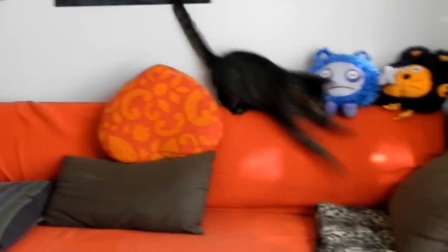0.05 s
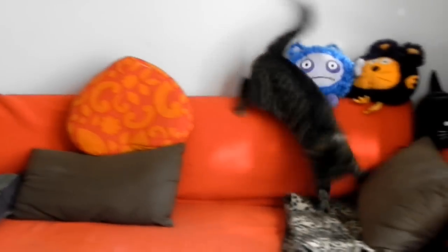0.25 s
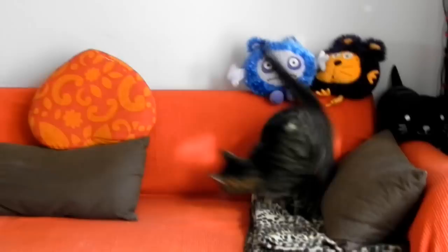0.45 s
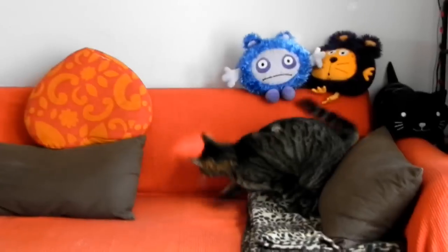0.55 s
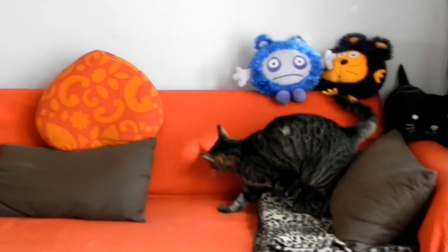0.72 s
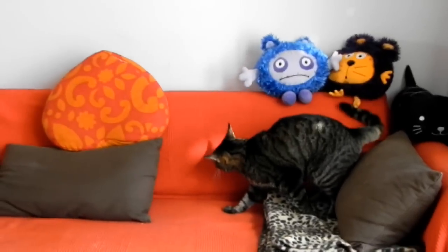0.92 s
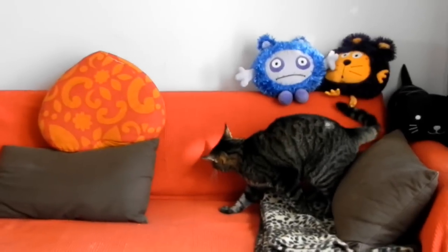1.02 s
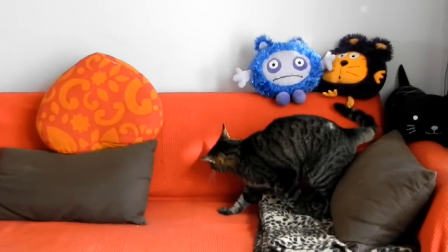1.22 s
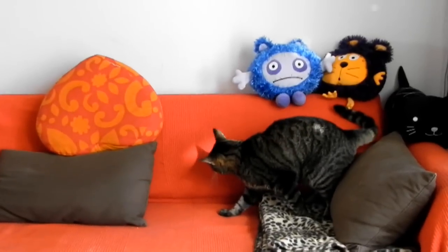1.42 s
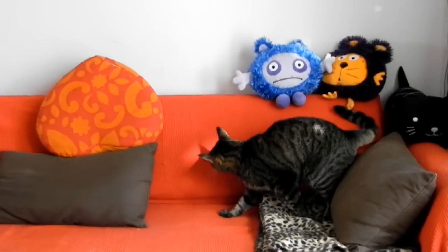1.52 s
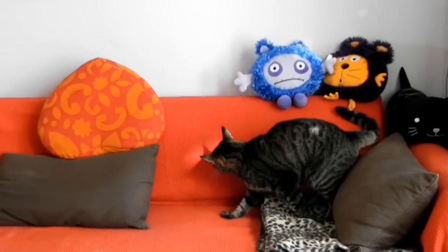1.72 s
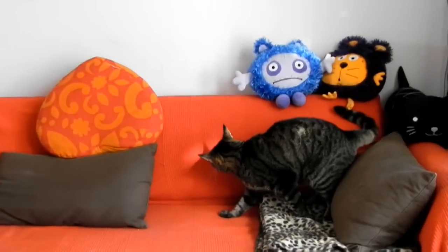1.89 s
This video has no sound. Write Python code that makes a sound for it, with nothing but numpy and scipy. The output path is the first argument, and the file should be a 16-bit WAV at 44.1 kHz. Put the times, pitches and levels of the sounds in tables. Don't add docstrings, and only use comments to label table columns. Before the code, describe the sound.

Cat paws thump on soft sofa cushions in a quiet, hissy room. Faint cloth rustle opens; light thuds begin around 0.2 seconds, claws scrape near 0.33, and the heaviest landing comes at 0.45 with a snappy claw catch and springy low sway. Another thump falls at 0.74, fading by 0.85. Then dry lens-motor ticks, about fifteen per second, continue to the end, with a barely audible brush near 1.1.

```python
import sys
import numpy as np
from scipy import signal
from scipy.fft import rfft, irfft
from scipy.io import wavfile
from scipy.ndimage import uniform_filter1d

SR = 44100
rng = np.random.default_rng(int(sys.argv[2]) if len(sys.argv) > 2 else 0)


def unload_audio(sound):
    columns = np.transpose(np.atleast_2d(sound))
    steps = np.round(np.clip(columns, -1, 1) * 32767)
    wavfile.write(sys.argv[1], SR, steps.astype(np.int16))


def amplitude_ratio(level_db):
    exponent = np.asarray(level_db, float) / 20
    return 10 ** exponent


N = 85995

# f/Hz, level/dB
MIDDLE_HISS = [(25, -64), (160, -6.5), (320, -14), (650, -8.5), (1500, -15), (7500, -27.5), (12000, -39.5),
               (15500, -34.5)]
# f/Hz, level/dB
SIDE_HISS = [(59, -29), (100, -16), (282, -14), (396, 3), (700, -4), (2710, -17), (7980, -32),
             (12200, -43.5), (15700, -41)]
# f/Hz, width/Hz, level/dB
ROOM_HUM = [(50, 27, -65.5), (96.2, 4.1, -64.5), (121.9, 8.1, -69.5), (238, 38, -75), (243.5, 23, -56.5),
            (423.5, 105, -55)]
# f/Hz, level/dB
APPLIANCE_TONES = [(120.5, -61), (217.5, -52)]
# t/s, effort/dB, brightness/dB
SCRAMBLE_EFFORT = [(0, -42, -1), (.07, -48, -6.5), (.12, -43.5, -4.5), (.17, -55.5, -3),
                   (0.216, -34.5, -15), (.25, -35.5, -28), (0.304, -43.5, -4), (0.323, -32, -9.5),
                   (0.348, -30.5, -5), (.385, -34, -6), (0.439, -32, -8.5), (0.455, -31, -3),
                   (0.536, -35.5, -14), (0.561, -47, -3.5), (.725, -50, -7.5), (0.738, -36.5, -16),
                   (.85, -48.5, -24), (1.0, -51, -12)]
# f/Hz, level/dB
CLOTH_TONE = [(60, -11), (150, 0), (270, 2.5), (550, 1.5), (1300, -15), (3000, -26.5), (4500, -39),
              (15500, -52.5)]
# f/Hz, width/Hz, level/dB
FRAME_MODES = [(56.4, 22, -4), (113.8, 32, 6.5), (177.7, 26, 2.5), (267, 6.3, 0)]
# t/s, level/dB, f/Hz, length/s
SPRING_HEAVES = [(.19, -42, 55, .07), (.44, -35, 51, .12), (.63, -38, 55, .09), (.73, -40, 58, .12),
                 (.56, -43, 60, .07), (.07, -42, 108, .05), (.447, -23.5, 120, .04), (.49, -28, 120, .055),
                 (.7318, -25, 110, .04), (.79, -29, 115, .04), (.13, -40, 116, .06), (.53, -40, 55, .05),
                 (.01, -40, 105, .06)]
# t/s, level/dB, cushion f/Hz, push length/s
PAW_THUMPS = [(.038, -35, 190, .022), (.183, -33, 205, .016), (.2185, -23, 186, .031),
              (.268, -33, 170, .014), (.3185, -25, 385, .010), (.329, -28, 262, .018),
              (.349, -26, 200, .012), (.360, -29, 240, .016), (.386, -30, 255, .016),
              (.403, -28, 410, .014), (.418, -33, 190, .016), (.4530, -13, 205, .019),
              (.471, -22, 265, .014), (.486, -23, 175, .014), (.490, -26, 310, .012),
              (.503, -31, 150, .012), (.5195, -25, 200, .014), (.532, -30, 185, .012),
              (.580, -36, 410, .02), (.635, -38, 400, .02), (.65, -37, 180, .02), (.7388, -19.5, 200, .018),
              (.759, -34, 580, .013), (.7565, -25, 250, .007), (.766, -29, 165, .022),
              (.800, -28, 215, .014), (.8145, -33, 170, .016), (.81, -36, 400, .014),
              (.835, -35, 130, .022)]
# knock/dB, knock f/Hz, ring/dB, rattle/dB
FAINT_STEP = (-57, 560, -54, -71)
# t/s, knock/dB, knock f/Hz, ring/dB, rattle/dB
MOTOR_STEPS = [(0.594, -40, 678, -44, -50), (0.667, -32, 550, -46, -56), (0.73, -27, 498, -44, -59),
               (0.794, -45, 565, -43.5, -55), (0.864, -30, 690, -45.5, -49.5),
               (0.928, -33.5, 520, -39, -52), (1, -30.5, 700, -47.5, -59), (1.066, -31.5, 538, -44.5, -63),
               (1.128, -30.5, 646, -45, -52), (1.198, -35, 798, -41.5, -57),
               (1.262, -34.5, 690, -39.5, -51), (1.329, -34.5, 680, -37, -55),
               (1.397, -29, 662, -67, -49.5), (1.464, -29.5, 520, -39, -51.5),
               (1.533, -29, 680, -40.5, -63), (1.594, -29, 675, -40, -53), (1.664, -32.5, 538, -49.5, -59),
               (1.731, -32, 527, -48.5, -56), (1.797, -26, 579, -51, -47.5), (1.865, -33, 557, -44, -56),
               (1.929, -26.5, 534, -44.5, -53)]
# f/Hz, width/Hz, level/dB
KNOCK_MODES = [(990, 250, -9), (430, 150, -7), (780, 250, -8), (1246, 300, -14)]
# f/Hz, width/Hz, level/dB
RING_MODES = [(1560, 180, 0), (1950, 500, -17)]
# f/Hz, width/Hz, level/dB
RATTLE_MODES = [(3900, 170, 0), (4480, 220, -7), (2950, 250, -11), (5130, 300, -16)]
# f/Hz, width/Hz, level/dB
CLICK_MODES = [(1200, 1200, 8), (2420, 1900, 5), (4140, 430, 1)]
# t/s, length/s, level/dB
FUR_SWISHES = [
    (0.072, 0.073, -55.5),
    (0.211, 0.056, -54.5),
    (0.34, 0.063, -70),
    (0.444, 0.044, -73),
    (1.08, 0.055, -55),
]
# f/Hz, level/dB
FUR_TONE = [(2500, 8), (6000, 1.5), (10000, 1), (15000, -12)]
# t/s, level/dB, f/Hz, width/Hz
CLAW_CATCHES = [(.210, -28, 650, 300), (.210, -39, 1300, 350), (.226, -35, 1250, 450),
                (.226, -31, 750, 400), (.326, -44, 7000, 5000), (.329, -30, 1900, 1200),
                (.352, -24, 1170, 250), (.449, -26, 900, 700), (.4555, -26, 2150, 450),
                (.4555, -25, 1050, 500), (.4555, -38, 7500, 3000), (.4555, -44, 11500, 4000),
                (.4555, -36, 4300, 1800), (.450, -47, 14000, 3000), (.445, -48, 7500, 200),
                (.4695, -45, 8500, 3000), (.4755, -47, 9000, 5000), (.466, -43, 4900, 300),
                (.741, -41, 2700, 900), (.741, -35, 1100, 500), (.733, -33, 700, 250),
                (.316, -29, 600, 400)]
# t/s, length/s, level/dB
CLAW_RAKES = [
    (.318, 0.057, -38),
    (.44, 0.057, -63),
    (1.085, 0.067, -57),
]
# f/Hz, level/dB
RAKE_TONE = [(800, -18), (1500, 26), (2300, 0), (3500, -9), (5000, -23), (9000, -47)]
# f/Hz, t60/s
ROOM_DECAY = [(60, 0.64), (200, 0.43), (600, 0.11), (2000, 0.25), (8000, 0.29)]
# f/Hz, level/dB
SIDE_PICKUP = [(40, -19), (200, -19), (350, -3), (600, 3.5), (3000, -2), (12000, -8.5)]


def evened(x):
    return x / np.sqrt(np.mean(x ** 2) + 1e-20)


def add(mix, start_s, sound):
    part = mix[..., round(start_s * SR):][..., :sound.shape[-1]]
    part += sound[..., :part.shape[-1]]


def colour(x, points):
    f, db = np.transpose(points)
    hz = np.fft.rfftfreq(len(x), 1 / SR)
    gain = amplitude_ratio(np.interp(np.log(hz + 1), np.log(f + 1), db))
    return irfft(rfft(x) * gain, len(x))


def resonate(x, hz, width):
    r = np.exp(-np.pi * width / SR)
    gain = (1 - r * r) / 2
    return signal.lfilter([gain, 0, -gain], [1, -2 * r * np.cos(2 * np.pi * hz / SR), r * r], x)


def body(x, modes):
    return sum(amplitude_ratio(db) * resonate(resonate(x, hz, width), hz, width) for hz, width, db in modes)


def air():
    middle, sides, rumble = rng.standard_normal((3, N))
    hum = sum(amplitude_ratio(db) * evened(resonate(resonate(rumble, hz, width), hz, width))
              for hz, width, db in ROOM_HUM)
    t = np.arange(N) / SR
    for hz, db in APPLIANCE_TONES:
        drift = uniform_filter1d(uniform_filter1d(rng.standard_normal(N), 1500), 1500)
        waver = 1 + 0.35 * evened(drift)
        hum = hum + amplitude_ratio(db) * np.sqrt(2) * waver * np.sin(2 * np.pi * hz * t)
    middle = amplitude_ratio(-51.5) * evened(colour(middle, MIDDLE_HISS)) + hum
    sides = amplitude_ratio(-42.5) * evened(colour(sides, [(20, -62)] + list(SIDE_HISS)))
    return np.array([middle, sides])


def scramble():
    grains_per_s, grain_spread_db = 4000, 2.5
    split_hz, bright_ref_db, frame_lag_s = 1320, -14.5, 0.017
    s, effort_db, bright_db = np.transpose(SCRAMBLE_EFFORT)
    t = np.arange(N) / SR
    effort = amplitude_ratio(np.interp(t, s, effort_db)) * np.clip((s[-1] - t) / 0.13, 0, 1)
    slips = rng.standard_normal(N) * (rng.random(N) < grains_per_s / SR)
    slips = slips * amplitude_ratio(grain_spread_db * np.minimum(rng.exponential(1, N), 4))
    cloth = evened(colour(evened(slips) + 0.5 * rng.standard_normal(N), CLOTH_TONE))
    dull = signal.sosfiltfilt(signal.butter(2, split_hz, fs=SR, output="sos"), cloth)
    cloth = dull + (cloth - dull) * amplitude_ratio(np.interp(t, s, bright_db) - bright_ref_db)
    pole = np.exp(-1 / (frame_lag_s * SR))
    drive = signal.lfilter([1 - pole], [1, -pole], effort) * rng.standard_normal(N)
    frame = body(drive, FRAME_MODES) * np.sqrt(SR / 100)
    return amplitude_ratio(0.5) * effort * cloth + amplitude_ratio(-10) * frame


def heaves():
    out = np.zeros(N)
    for s, db, hz, length in SPRING_HEAVES:
        t = np.arange(0, length, 1 / SR)
        add(out, s, amplitude_ratio(db) * np.sin(np.pi * t / length) * np.sin(2 * np.pi * hz * t))
    return out


def thumps():
    rise_share, overtone_ratio, overtone_db = 0.2, 2.1, -24
    out = np.zeros(N)
    for (s, db, hz, length), turn in zip(PAW_THUMPS, rng.random(len(PAW_THUMPS))):
        t = np.arange(0, 2 * length, 1 / SR)
        u = t / length
        push = np.minimum(u / rise_share, 1) * np.exp(-u ** 6)
        overtone = np.sin(2 * np.pi * (overtone_ratio * hz * t + turn))
        wave = -np.sin(2 * np.pi * hz * t) + amplitude_ratio(overtone_db) * overtone
        add(out, s, amplitude_ratio(db) * push * wave)
    return out


def lens():
    early_s, ticks_per_s, rise_s, step_s = 0.062, 15, 0.00188, 0.0053
    early = [(early_s + k / ticks_per_s, *FAINT_STEP) for k in range(8)]
    out, t = np.zeros((2, N)), np.arange(2600) / SR
    spans = step_s * np.array([[2.4], [0.7], [1.2], [0.6]])
    sides = (-0.53, 0.19, -0.076, 0.5)
    for s, knock_db, knock_hz, ring_db, rattle_db in early + list(MOTOR_STEPS):
        envelope = np.minimum(t / rise_s, 1) * np.exp(-(t / spans) ** 2)
        chatter = rng.standard_normal((4, len(t))) * envelope
        levels = (knock_db - 6.5, ring_db + 3.5, rattle_db + 6, -46.5)
        knock = [(knock_hz, 120, 0)] + KNOCK_MODES
        shells = (knock, RING_MODES, RATTLE_MODES, CLICK_MODES)
        for x, db, modes, side in zip(chatter, levels, shells, sides):
            ring = body(x, modes)
            add(out, s - rise_s, amplitude_ratio(db) * ring / abs(ring).max() * np.array([[1], [side]]))
    return out


def claws():
    snap_s = 0.001
    out = np.zeros(N)
    for s, db, hz, width in CLAW_CATCHES:
        t = np.arange(600) / SR
        snap = body(rng.standard_normal(600) * t * np.exp(-t / snap_s), [(hz, width, 0)])
        add(out, s, amplitude_ratio(db) * snap / abs(snap).max())
    fur = evened(colour(rng.standard_normal(N), [(1000, -27)] + FUR_TONE))
    rake = evened(colour(fur, RAKE_TONE))
    for strokes, noise in ((FUR_SWISHES, fur), (CLAW_RAKES, rake)):
        for s, length, db in strokes:
            n = round(length * SR)
            add(out, s, amplitude_ratio(db) * np.hanning(n) * noise[round(s * SR):][:n])
    return out


def room(x):
    hz, t, z = signal.stft(rng.standard_normal((2, SR // 2)), SR, nperseg=512)
    f, t60 = np.transpose(ROOM_DECAY)
    fall_s = np.interp(np.log(hz + 1), np.log(f), t60)[:, None]
    tail = signal.istft(z * amplitude_ratio(-60 * t / fall_s), SR, nperseg=512)[1]
    tail = tail * np.clip(np.arange(tail.shape[1]) / SR / 0.003, 0, 1)
    return signal.fftconvolve(x[None], tail / np.linalg.norm(tail[0]), axes=1)[:, :N]


def scene():
    blows, snaps = thumps() + heaves(), claws()
    rub = scramble() + snaps
    wet = room(rub + amplitude_ratio(-12) * blows)
    mid, side = air() + lens()
    mid = mid + blows + rub + amplitude_ratio(-5) * wet[0]
    lean = -0.31 * (2 * blows + rub)
    side = side - 0.35 * snaps + colour(lean + amplitude_ratio(-0.5) * wet[1], SIDE_PICKUP)
    return np.array([mid + side, mid - side])


def low_pass(x):
    return signal.sosfilt(signal.butter(12, 17010, fs=SR, output="sos"), x)


def record(dry):
    edge = signal.firwin(511, 15790, window=("kaiser", 9), fs=SR)
    mix = signal.oaconvolve(dry, edge[None], "same")
    return low_pass(mix)


dry = scene()
out = record(dry)
unload_audio(out)
```